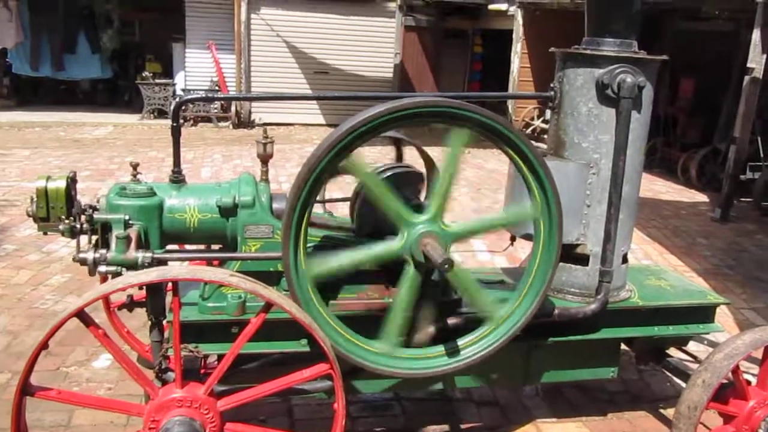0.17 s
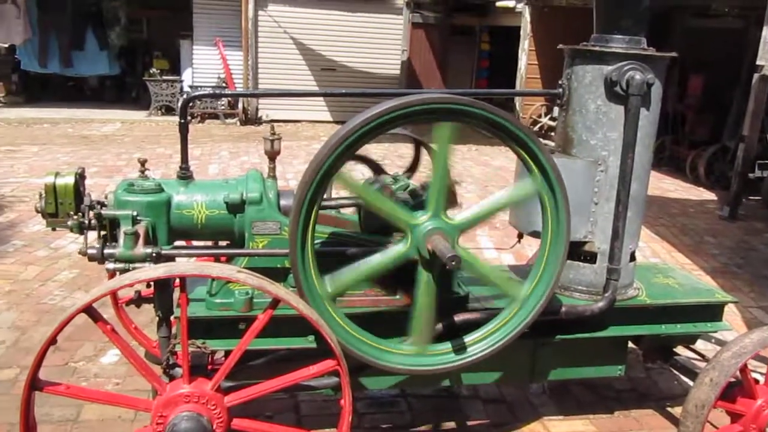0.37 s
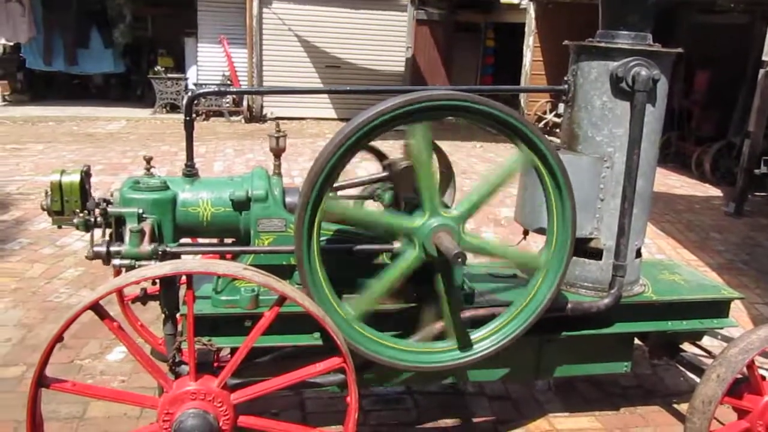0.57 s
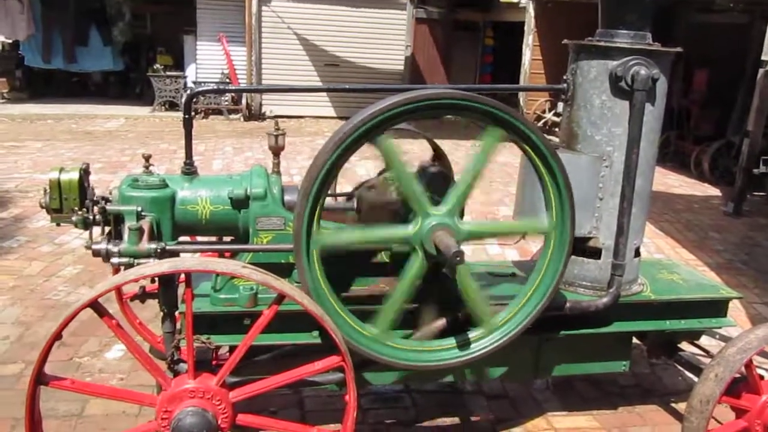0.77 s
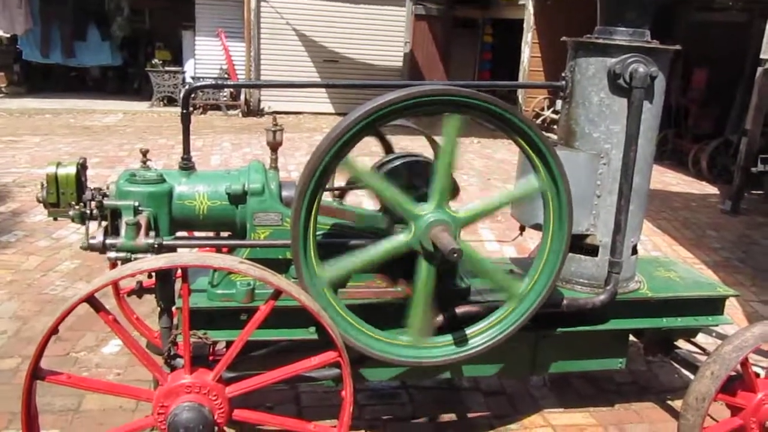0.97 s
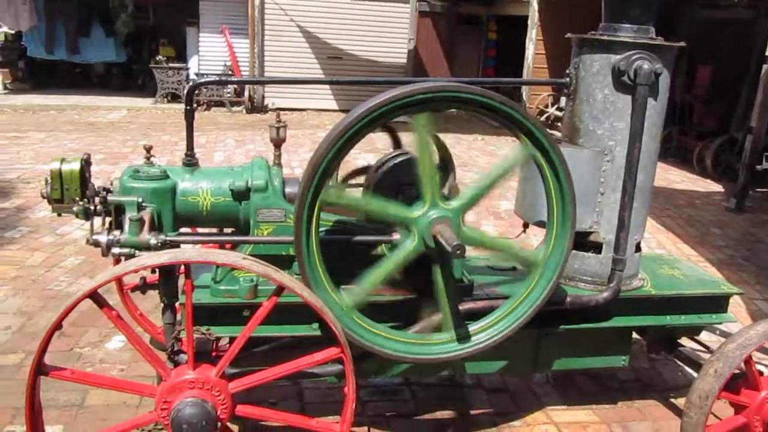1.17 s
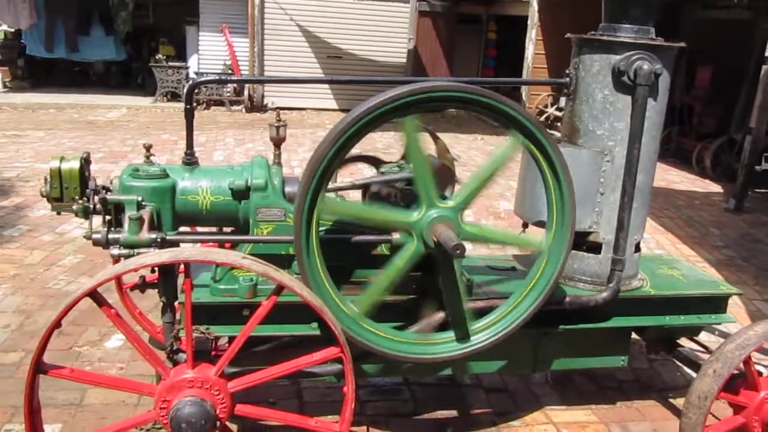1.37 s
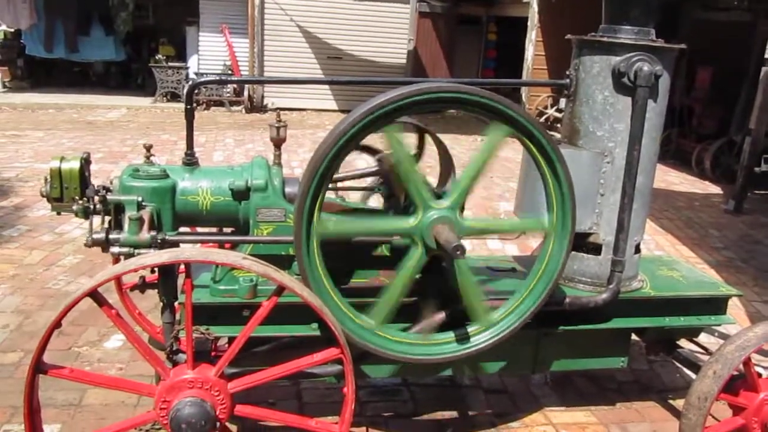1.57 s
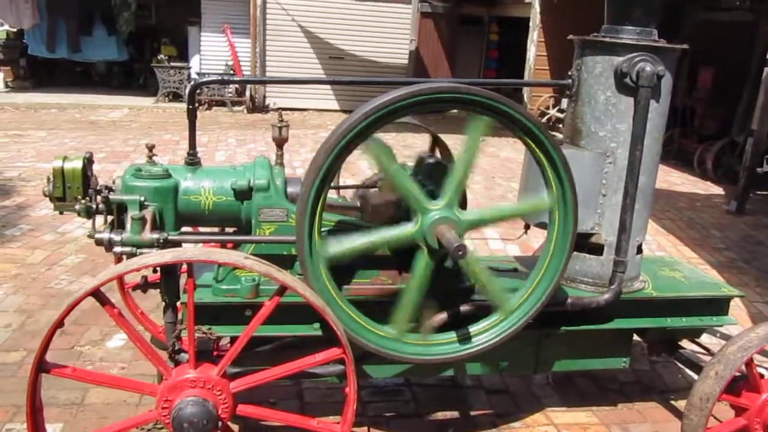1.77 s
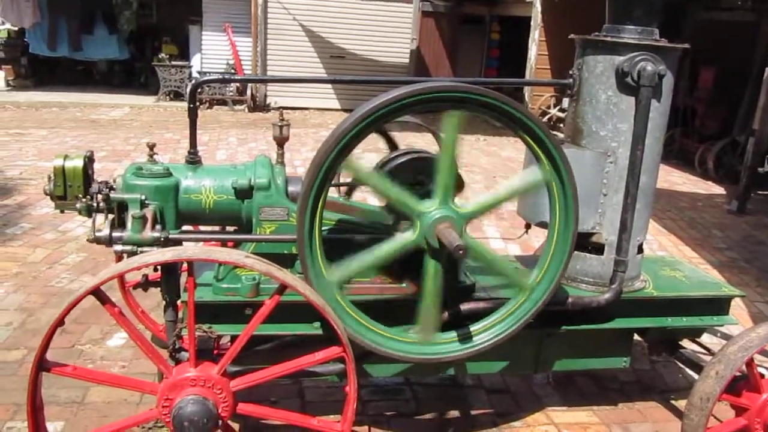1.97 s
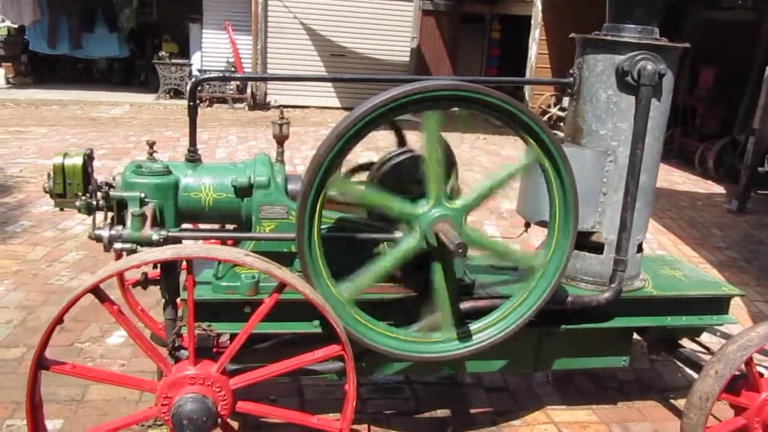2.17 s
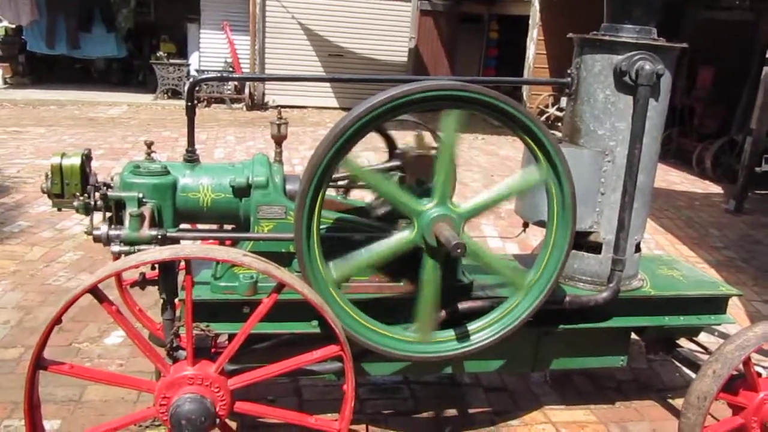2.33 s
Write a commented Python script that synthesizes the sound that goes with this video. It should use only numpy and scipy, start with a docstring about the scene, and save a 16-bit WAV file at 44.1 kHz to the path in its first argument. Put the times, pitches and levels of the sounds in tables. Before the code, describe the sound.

Close outdoor pickup of a vintage stationary engine, its latch, valves and linkage clattering in a quick loose rhythm; air hisses and chuffs, gears grind quietly, and two loud hollow exhaust pops stand out, with slight yard echo.

```python
"""In a brick yard, an old single-cylinder stationary engine ticks over on its cart, about two cycles a second.
Blows on the latch, magneto, tappet, exhaust valve and linkage are noise bursts plus ringing tones.
Shaped noise makes the gas flow: three strokes only chuff, two fire and bark through the ringing exhaust
pipe with a deep boom, and air hisses in at the intake. Gears grind and the cart bed rumbles throughout;
delayed, fading noise gives the echoes of the yard."""
import sys
import numpy as np
from scipy import signal
from scipy.fft import rfft, irfft
from scipy.io import wavfile
from scipy.ndimage import uniform_filter1d

SR = 44100
rng = np.random.default_rng(int(sys.argv[2]) if len(sys.argv) > 2 else 0)


def dump(signal):
    """Clip the signal to [-1, 1] and save it as 16-bit WAV at the path in sys.argv[1]."""
    limited = np.clip(np.atleast_2d(signal).T, -1, 1)
    pcm = np.round(limited * 32767).astype(np.int16)
    wavfile.write(sys.argv[1], SR, pcm)


N = 105884
T = np.arange(N) / SR  # time [s]
STRIKE_RISE_S = .00015  # how fast a blow sets in

# Tappet meets the exhaust valve: (time [s], level [dB])
TAPPET_TIMES = [(.1425, -27), (.6475, -26.5), (1.1616, -26), (1.6552, -28.5), (2.1598, -25.5)]
# Exhaust valve drops on its seat: (time [s], level [dB])
KNOCK_TIMES = [(.2890, -17), (.7988, -15.5), (1.3062, -25), (1.8045, -18)]
# Fired exhaust strokes: (time [s], level [dB])
FIRING_TIMES = [(1.175, -0.5), (2.1725, -1)]
# Ringing tones of the iron casting: (frequency [Hz], level [dB], time to fall by 60 dB [s])
IRON_MODES = [(1023, -17, .2), (1345, -7, .15), (1448, -1, .16), (1735, -5, .2), (1970, -5, .15),
              (2172, -9, .2), (2640, -12, .12), (3042, -13, .15), (3283, 0, .08), (3345, -6, .07),
              (3570, -8, .07), (4177, -11, .07)]
# Hollow resonances of the tank and frame: (frequency [Hz], width [Hz], level [dB])
FRAME_PEAKS = [(385, 40, 2), (572, 18, 6), (713, 22, 5), (990, 35, 4), (1448, 30, 3), (1740, 35, 2)]
# Spectrum of light ticks and of the closing intake: (frequency [Hz], level per Hz [dB])
TICK_SPECTRUM = [(300, 15), (2000, -2.5), (5000, 2), (7500, 3), (9300, 4), (12000, -12), (16000, -30.5)]


def undb(db):
    """Turn decibels into a gain."""
    return 10 ** (np.asarray(db) / 20)


def fade(t60):
    """Exponential decay from time zero, falling 60 dB in t60 seconds."""
    return np.exp(-np.log(1000) * T / max(t60, 1e-4))


def noise(tone, peaks=()):
    """Noise with a spread of 1, a smooth spectrum and optional resonances."""
    f = np.maximum(np.arange(N // 2 + 1) * SR / N, 1)
    hz, db = np.array(tone).T
    gain = undb(np.interp(np.log(f), np.log(hz), db))
    resonances = sum(undb(level) ** 2 / (1 + (2 * (f - centre) / width) ** 2) for centre, width, level in peaks)
    gain = gain * np.sqrt(1 + resonances)
    x = irfft(rfft(rng.standard_normal(N)) * gain, N)
    return x / x.std()


def walk(rate):
    """Slow random wandering with a spread of 1: about rate new values a second, smoothed."""
    hold = int(SR / rate)
    steps = rng.standard_normal(N)[np.arange(N) // hold]
    x = uniform_filter1d(steps, hold)
    return x / x.std()


def play(events, shape):
    """Start a copy of the shape at each (time [s], level [dB]) row."""
    out = np.zeros(N)
    for time, level in events:
        i = max(int(time * SR), 0)
        out[i:] += undb(level) * shape[:N - i]
    return out


def stroke(attack_s, hold_s, release_t60):
    """Envelope that rises smoothly, holds and then decays, as when a valve opens, stays open and closes."""
    rise = np.sin(np.pi / 2 * np.minimum(T / attack_s, 1)) ** 2
    return rise * np.exp(-np.log(1000) * np.maximum(T - attack_s - hold_s, 0) / release_t60)


def ring(modes):
    """Decaying tones of a struck part, which build up as the blow spreads through it."""
    rise_s = 0.00095
    x = sum(undb(db) * fade(t60) * np.sin(2 * np.pi * (hz * T + rng.random())) for hz, db, t60 in modes)
    rise = np.sin(np.pi / 2 * np.minimum(T / rise_s, 1)) ** 2
    power = sum(undb(db) ** 2 for _, db, _ in modes) / 2  # before the rise and decay
    return rise * x / np.sqrt(power)


def contact(crack_t60, tail_db, tail_t60, bounce_s, bounce_db):
    """Envelope of a blow: a crack, one rebound and the dense ringing after it."""
    crack = stroke(STRIKE_RISE_S, 0, crack_t60)
    rebound = play([(bounce_s, bounce_db)], crack)
    tail = undb(tail_db) * stroke(STRIKE_RISE_S, 0, tail_t60)
    return np.sqrt(crack ** 2 + rebound ** 2 + tail ** 2)


def strike(events, tone, envelope, modes, ring_db, alike=0.31):
    """Blows on one part: dense noise, partly alike in every blow and partly rattling, plus clear tones."""
    body = np.sqrt(alike) * envelope * noise(tone) + undb(ring_db) * ring(modes)
    chatter = undb(1 * walk(300))  # loose parts: the level wanders with a spread of 1 dB
    rattle = np.sqrt(1 - alike) * play(events, envelope) * noise(tone) * chatter
    return play(events, body) + rattle


def pipe(gas):
    """Gas leaves the exhaust pipe directly and also sets its resonances ringing."""
    # Resonances of the exhaust pipe: (frequency [Hz], width [Hz], relative level [dB])
    pipe_peaks = [(325, 30, -6), (380, 40, -3), (572, 20, 2), (713, 25, -2), (960, 30, -3), (996, 35, 1),
                  (1040, 25, -4), (1202, 35, 1), (1776, 40, -5), (2246, 45, -4), (2300, 50, -7),
                  (2440, 35, -4), (2572, 40, -4), (3746, 25, -4), (4590, 28, 0), (4780, 35, -4)]
    response = np.zeros(N)
    for hz, width, db in pipe_peaks:
        decay = np.exp(-np.pi * width * T)  # a narrow resonance rings longer
        response += undb(db) * 2 * np.pi * width / SR * decay * np.cos(2 * np.pi * hz * T)
    return gas + undb(6) * signal.fftconvolve(gas, response)[:N]


def gears():
    """Gears and bearings grind on as noise coloured by the frame, swelling once a cycle."""
    # Spectrum of the grinding: (frequency [Hz], level per Hz [dB])
    run_spectrum = [(25, -9.5), (60, 3.5), (110, 4), (190, -16.5), (340, 4.5), (520, -6.5), (800, -6.5),
                    (1500, -10), (1900, -13.5), (3300, -8.5), (8600, -18), (13000, -34.5), (16000, -46)]
    level_db, swell_depth_db = -44, 3.5
    cycle_s, loudest_s = 0.496, 0.24  # the swell peaks at loudest_s in each cycle
    swell_db = swell_depth_db * np.cos(2 * np.pi * (T - loudest_s) / cycle_s)
    return noise(run_spectrum, FRAME_PEAKS) * undb(level_db + swell_db + 1.6 * walk(90))


def cart():
    """The cart bed rumbles at its resonance; each valve knock shakes it and kicks off a low tone."""
    cart_hz = 105
    spectrum = [(25, -13), (60, -7), (cart_hz, 0), (140, -2), (190, -16), (600, -50), (2000, -90)]
    bed = noise(spectrum, [(cart_hz, 14, 5)])
    shake = play(KNOCK_TIMES, stroke(attack_s=0.0063, hold_s=0.17, release_t60=.2))
    kick_shape = stroke(attack_s=.02, hold_s=0.011, release_t60=.13)
    kick = play(KNOCK_TIMES, kick_shape * np.sin(2 * np.pi * cart_hz * T))
    return bed * (undb(-47) + undb(-31) * shake) + undb(-21.5) * kick


def governor_latch():
    """The governor latch snaps: a noisy blow with a rebound and ringing tones."""
    # Latch blows: (time [s], level [dB])
    latch_times = [(.0018, -23.5), (.5018, -22), (1.5168, -25.5)]
    # Spectrum of the blow: (frequency [Hz], level per Hz [dB])
    latch_spectrum = [(100, -16.5), (700, 1), (1200, -2), (2600, 5), (4700, 5.5), (6500, -4.5), (9500, -5),
                      (12000, -22.5), (16000, -24.5)]
    # Ringing tones of the latch: (frequency [Hz], level [dB], time to fall by 60 dB [s])
    latch_modes = [(400, -4, .07), (1745, -3, .12), (2590, -6, .08), (3090, -5, .08), (3350, -5, .07),
                   (4470, 0, .06), (4720, -3, .05)]
    blow = contact(crack_t60=0.028, tail_db=-1, tail_t60=0.13, bounce_s=0.01, bounce_db=2)
    return strike(latch_times, latch_spectrum, blow, latch_modes, ring_db=-0.5)


def magneto():
    """The magneto trips with a sharp ringing snap and a short burst of bright noise."""
    # Magneto trips: (time [s], level [dB])
    snap_times = [(.0343, -16.5), (.5365, -14), (1.0517, -15.5), (1.5488, -18.5), (2.0528, -16)]
    # Spectrum of the snap: (frequency [Hz], level per Hz [dB])
    snap_spectrum = [(100, -4), (700, -16), (1500, -1.5), (2800, -4.5), (4800, 1), (8300, -5), (11500, -18),
                     (16000, -27)]
    # Ringing tones of the magneto: (frequency [Hz], level [dB], time to fall by 60 dB [s])
    magneto_modes = [(3970, -1, .06), (4360, -3, .06), (5180, -3, .08), (5550, -3, .1), (7950, 0, .03),
                     (8350, -1, .03)]
    blow = contact(crack_t60=0.0098, tail_db=-9, tail_t60=0.12, bounce_s=0.001, bounce_db=-7)
    snap = strike(snap_times, snap_spectrum, blow, magneto_modes, ring_db=-6)
    burst = play(snap_times, stroke(STRIKE_RISE_S, hold_s=.001, release_t60=0.015))
    bright = noise([(2000, -11), (8200, 3), (11000, -9), (16000, -11.5)])
    return snap + undb(-12.5) * burst * bright


def push_rod():
    """The push rod slides in its guide with a hiss, then drags as it lifts the valve."""
    # The rod starts to slide: (time [s], level [dB])
    slide_times = [(.105, -39.5), (1.105, -40.5), (2.115, -38.5)]
    slide = play(slide_times, stroke(attack_s=.014, hold_s=0.0091, release_t60=0.023))
    hiss = noise([(300, -11), (2500, -7.5), (4500, -3.5), (7500, 0.5), (10500, -9.5), (15000, -28.5)])
    drag = undb(-38) * play(TAPPET_TIMES, stroke(attack_s=.008, hold_s=.04, release_t60=.12))
    scrape = noise([(150, -8), (400, 0.5), (800, -2), (1800, -6), (4000, -19.5), (12000, -35)], FRAME_PEAKS)
    return slide * hiss + drag * scrape


def tappet():
    """The tappet meets the exhaust valve: a blow that rebounds and rings the push rod."""
    # Spectrum of the blow: (frequency [Hz], level per Hz [dB])
    tappet_spectrum = [(100, -11.5), (500, -6.5), (1600, 6.5), (2400, 0), (4500, 3.5), (6000, -6),
                       (7300, 4), (8500, -17.5), (11000, -26.5), (15000, -38.5)]
    # Ringing tones of the push rod: (frequency [Hz], level [dB], time to fall by 60 dB [s])
    rod_modes = [(667, -6, 0.24), (1390, -3, 0.13), (1643, 3.5, 0.027), (4430, -16, 0.053),
                 (6740, 4.5, 0.07), (6760, -7, .025)]
    blow = contact(crack_t60=0.021, tail_db=-8, tail_t60=0.15, bounce_s=0.0037, bounce_db=4.5)
    return strike(TAPPET_TIMES, tappet_spectrum, blow, rod_modes, ring_db=-3.5, alike=.3)


def light_ticks():
    """Springs and pins tick lightly: short bursts of noise with a rebound and no clear tones."""
    # Ticks: (time [s], level [dB])
    tick_times = [(.1715, -33), (.2092, -25), (.406, -26), (.426, -34), (.604, -30), (.674, -33.5),
                  (.716, -29.5), (.821, -37), (.893, -46), (1.027, -41.5), (1.3215, -36.5), (1.423, -34.5),
                  (1.62, -38), (1.6845, -32), (1.7243, -30.5), (1.898, -45)]
    blow = contact(crack_t60=0.031, tail_db=-13, tail_t60=0.11, bounce_s=0.0033, bounce_db=-6)
    return play(tick_times, blow) * noise(TICK_SPECTRUM)


def chuffs():
    """Unburnt air chuffs out through the pipe as soft noise."""
    # Unfired exhaust strokes: (time [s], level [dB])
    chuff_times = [(.203, -35), (.714, -34), (1.724, -36)]
    # Spectrum of the air: (frequency [Hz], level per Hz [dB])
    chuff_spectrum = [(80, -1.5), (180, -5.5), (330, 8), (600, -3), (1300, -1), (2600, -3.5), (4500, -11.5),
                      (6500, -22), (9000, -15.5), (15000, -51)]
    flow = play(chuff_times, stroke(attack_s=0.018, hold_s=0.018, release_t60=0.45))
    return pipe(flow * noise(chuff_spectrum))


def linkage():
    """Slack in the linkage clacks and rings the iron casting."""
    # Clacks: (time [s], level [dB])
    clack_times = [(.2549, -32.5), (.278, -35), (.3765, -26), (.4248, -23), (.765, -32), (.8885, -28),
                   (.9388, -25.5), (1.3925, -32.5), (1.4408, -27.5), (1.772, -38.5), (1.893, -25.5),
                   (1.9425, -26.5)]
    # Spectrum of the clack: (frequency [Hz], level per Hz [dB])
    clack_spectrum = [(30, -25), (110, -10), (700, -17.5), (1500, 6), (2200, 1), (4500, -5.5),
                      (6500, -14.5), (10000, -30), (15000, -44)]
    blow = contact(crack_t60=0.018, tail_db=-2, tail_t60=0.14, bounce_s=0.0061, bounce_db=-3.5)
    return strike(clack_times, clack_spectrum, blow, IRON_MODES, ring_db=-7.5)


def valve_knock():
    """The exhaust valve drops on its seat and rings the iron casting, much alike in every blow."""
    # Spectrum of the knock: (frequency [Hz], level per Hz [dB])
    knock_spectrum = [(30, -20), (100, -11), (700, -25.5), (1500, 10.5), (2400, 3.5), (3400, 7.5),
                      (5000, -4), (9000, -13), (12000, -62), (16000, -60)]
    blow = contact(crack_t60=.011, tail_db=-5.5, tail_t60=0.078, bounce_s=.0035, bounce_db=0.5)
    return strike(KNOCK_TIMES, knock_spectrum, blow, IRON_MODES, ring_db=-7.5, alike=0.76)


def intake():
    """Air hisses in unsteadily, brighter as the intake valve closes."""
    # Intake strokes: (time [s], level [dB])
    intake_times = [(.315, -36), (.822, -33.5), (1.335, -42.5), (1.828, -33)]
    # Spectrum of the open intake: (frequency [Hz], level per Hz [dB])
    intake_spectrum = [(100, -31), (350, -0.5), (600, -4.5), (1000, 0), (1450, -1.5), (2300, -3.5),
                       (4000, -3), (5800, -4), (8700, -4.5), (11500, -17.5), (16000, -30.5)]
    flow = play(intake_times, stroke(attack_s=0.03, hold_s=0.064, release_t60=0.14))
    late = play([(.085, 0)], stroke(attack_s=0.013, hold_s=0.018, release_t60=0.17))
    closing = undb(-4.5) * play(intake_times, late) * noise(TICK_SPECTRUM)
    return (flow * noise(intake_spectrum) + closing) * undb(2.3 * walk(130))


def trip_gear_groan():
    """The trip gear gives a short low groan, one steady tone, as its spring is loaded."""
    # Groans just before a magneto snap: (time [s], level [dB])
    groan_times = [(1.012, -39), (2.012, -40)]
    groan_hz = 452
    envelope = stroke(attack_s=.01, hold_s=0.015, release_t60=0.037)
    return play(groan_times, envelope * np.sin(2 * np.pi * groan_hz * T))


def firing():
    """Burnt gas leaks, blasts out of the pipe and tails off: noise under three overlapping envelopes."""
    # Spectrum of the blast: (frequency [Hz], level per Hz [dB])
    blast_spectrum = [(60, -13), (240, -1), (400, 2), (560, -5), (800, -2), (1300, 0), (2000, -1),
                      (2900, 1), (3900, -7.5), (4600, -2.5), (6200, -2.5), (8500, -11), (12000, -14.5),
                      (16000, -38.5)]
    # Spectrum of the gas that follows: (frequency [Hz], level per Hz [dB])
    afterflow_spectrum = [(60, -11), (180, 6.5), (350, -6), (700, -17.5), (2000, 0), (5000, 1.5), (9000, 1),
                          (15000, -28)]
    leak = undb(-27.5) * stroke(attack_s=0.0048, hold_s=.004, release_t60=.02)
    burst = play([(.006, 0.0049)], stroke(attack_s=.008, hold_s=0.0055, release_t60=0.1))
    blast = leak + undb(-18.5) * burst
    afterflow = undb(-29) * stroke(attack_s=0.012, hold_s=0.023, release_t60=0.2)
    blast_gas = play(FIRING_TIMES, blast) * noise(blast_spectrum)
    late_gas = play(FIRING_TIMES, afterflow) * noise(afterflow_spectrum)
    return pipe(blast_gas + late_gas)


def silencer_boom():
    """Each firing sends a pressure wave into the silencer: a short deep boom with a low thump."""
    boom_hz, boom_db, peak_s, width_s = 380, -9, .0075, 0.0037
    thump_hz, thump_db = 68, -20.5
    swell = np.exp(-((T - peak_s) / width_s) ** 2 / 2)
    swell = swell + undb(-16.5) * stroke(attack_s=0.024, hold_s=.006, release_t60=.1)
    boom = -undb(boom_db) * swell * np.sin(2 * np.pi * boom_hz * T)
    thump_shape = stroke(attack_s=.003, hold_s=0.0058, release_t60=0.012)
    thump = -undb(thump_db) * thump_shape * np.sin(2 * np.pi * thump_hz * T)
    return play(FIRING_TIMES, boom + thump)


def yard(x):
    """Scattered echoes from paving and sheds: the sound is smeared by delayed, fading noise."""
    level_db, t60_s, delay_s = -16, 0.55, .012
    echoes = fade(t60_s) * noise([(100, 9), (2500, 3), (7000, -1.5), (15000, -3.5)])
    tail = play([(delay_s, 0)], echoes)
    return undb(level_db) * signal.fftconvolve(x, tail / np.linalg.norm(tail))[:N]


def scene():
    """Add all parts of the engine; the yard echoes all but the gears, cart and silencer boom."""
    metal = governor_latch() + magneto() + tappet() + light_ticks() + linkage() + valve_knock()
    rubbing = push_rod() + trip_gear_groan()
    gas = chuffs() + intake() + firing()
    engine = metal + rubbing + gas
    return (engine + yard(engine) + silencer_boom() + gears() + cart())[None]


def record(dry):
    """The sound stops abruptly, and a steep low-pass filter cuts the top."""
    stop_s, top_hz = 2.2495, 15800
    low_pass = signal.ellip(10, .2, 80, top_hz, fs=SR, output="sos")
    return signal.sosfilt(low_pass, dry * (T < stop_s))


dry = scene()
out = record(dry)
dump(out)
```